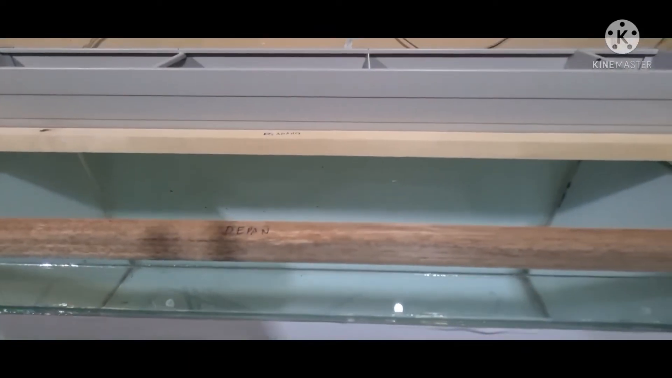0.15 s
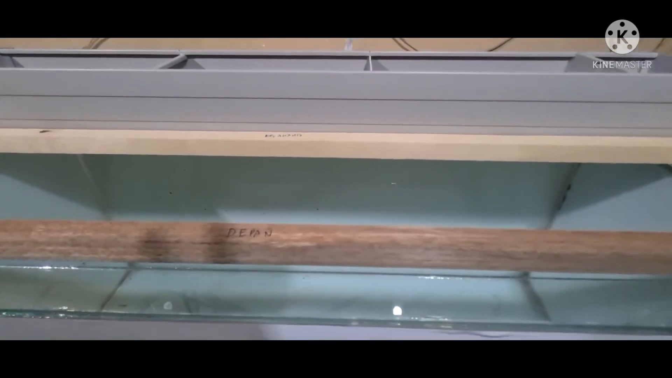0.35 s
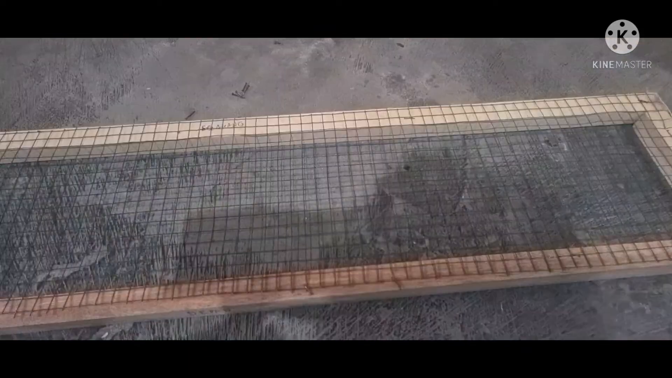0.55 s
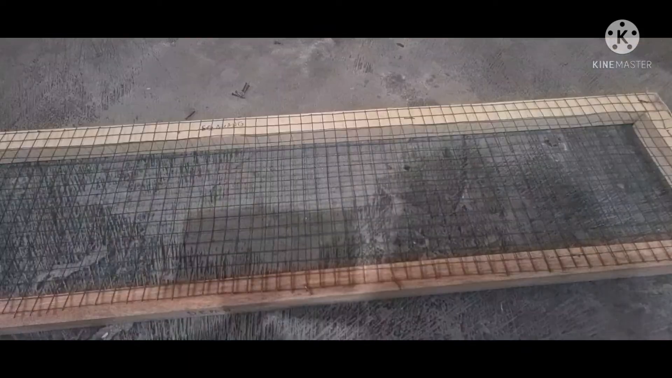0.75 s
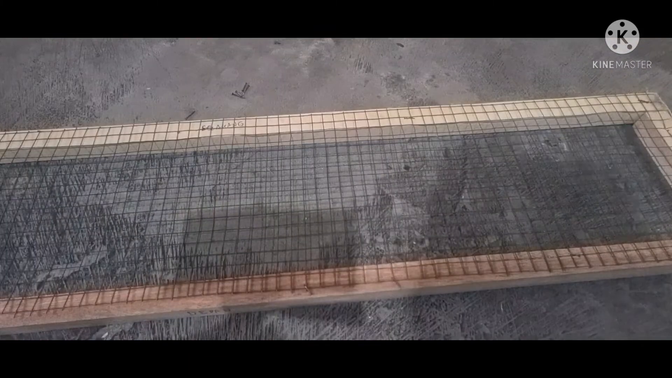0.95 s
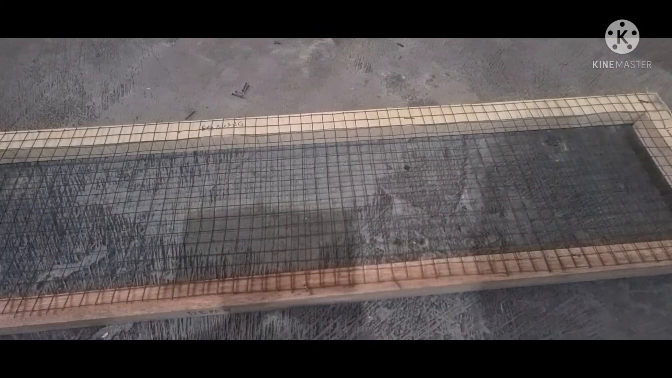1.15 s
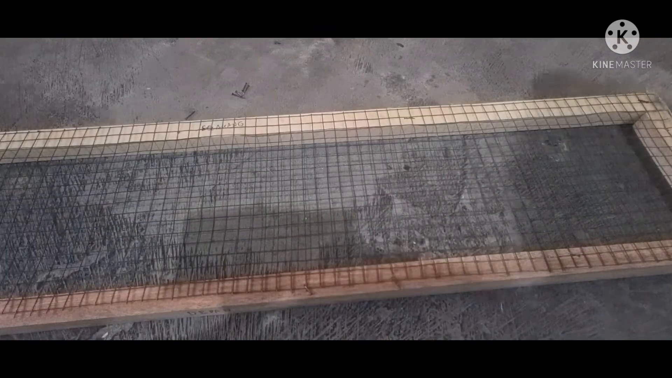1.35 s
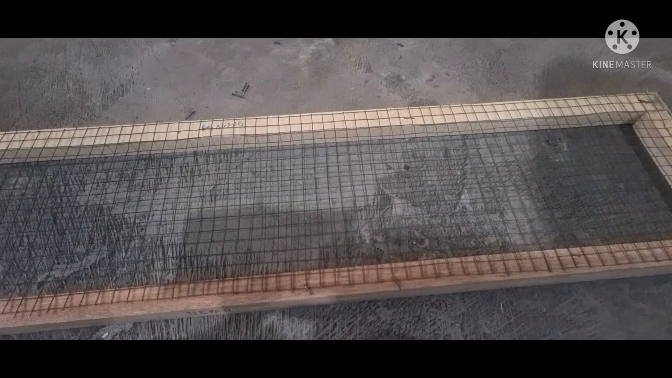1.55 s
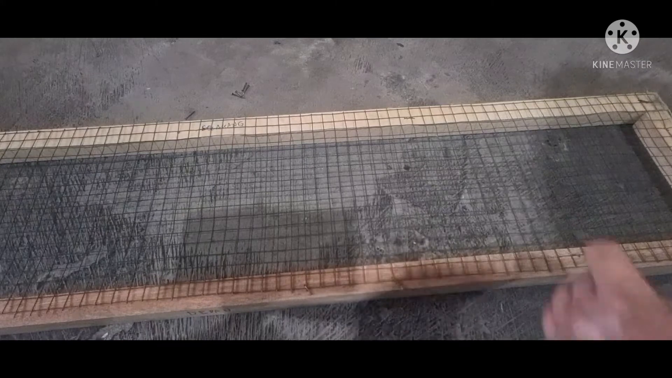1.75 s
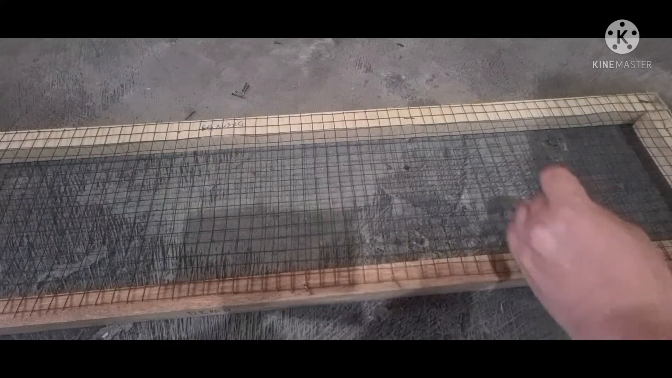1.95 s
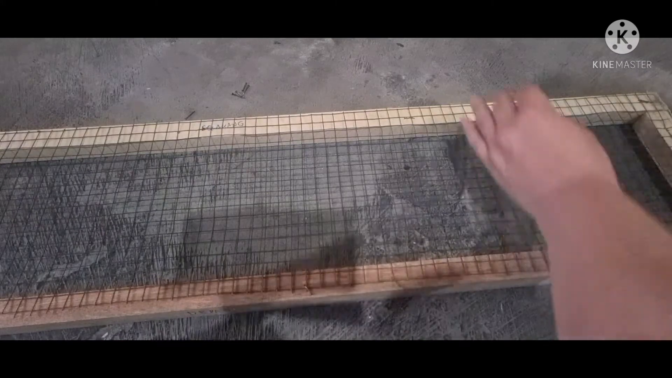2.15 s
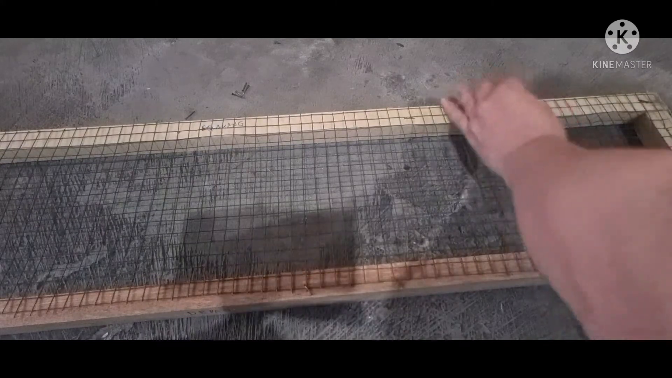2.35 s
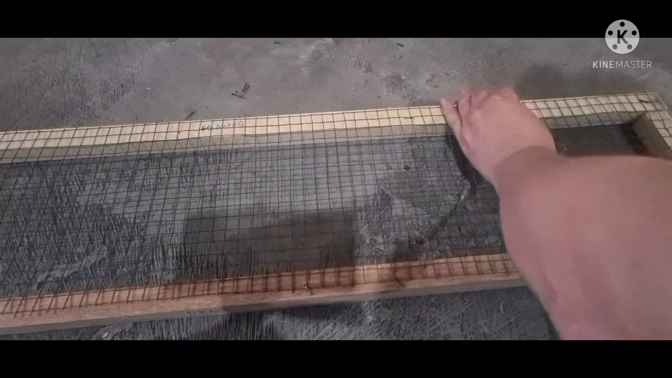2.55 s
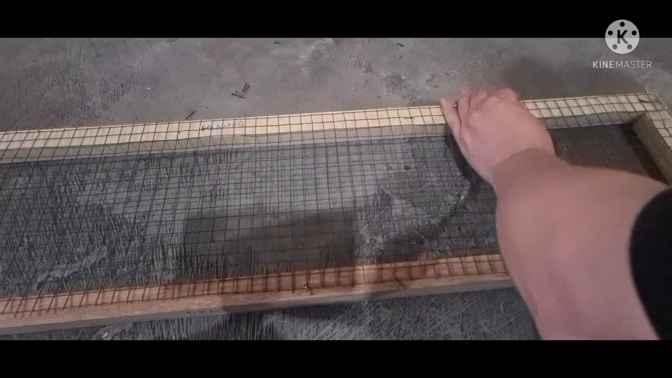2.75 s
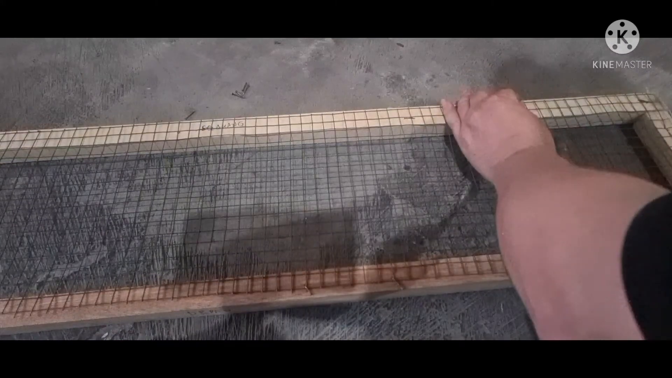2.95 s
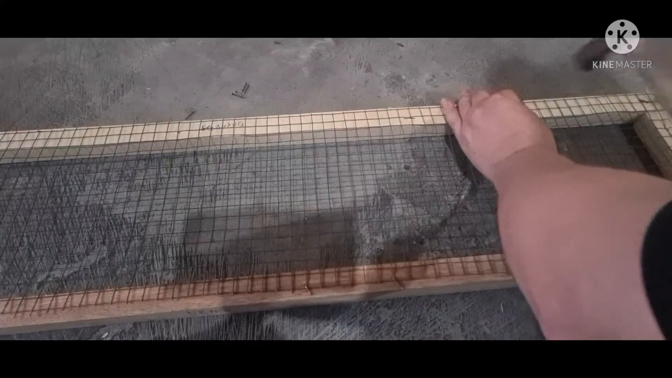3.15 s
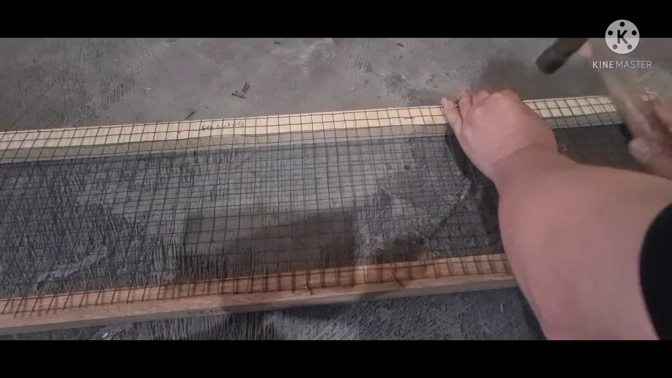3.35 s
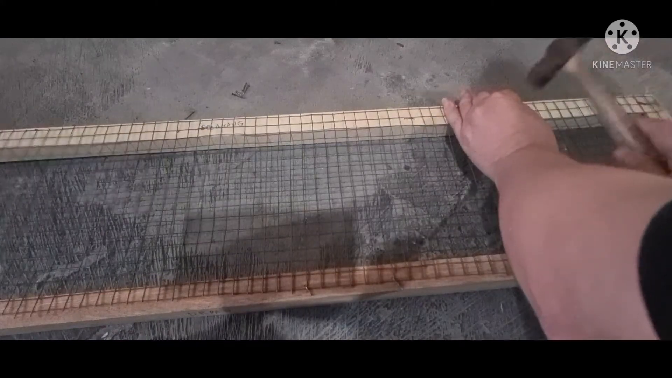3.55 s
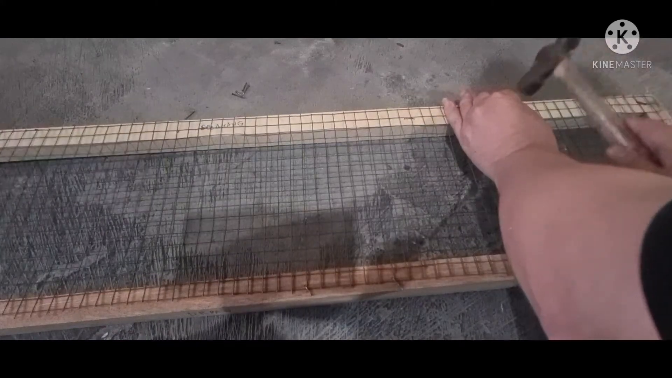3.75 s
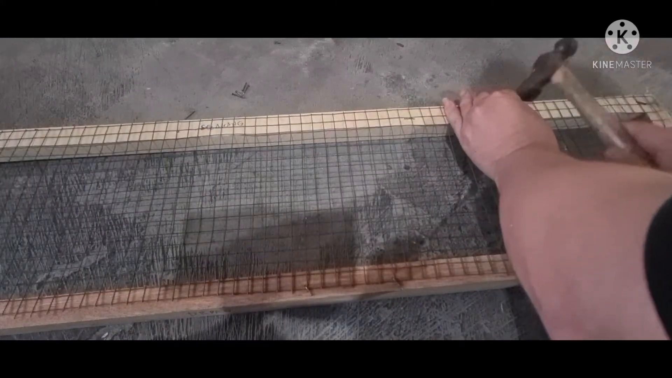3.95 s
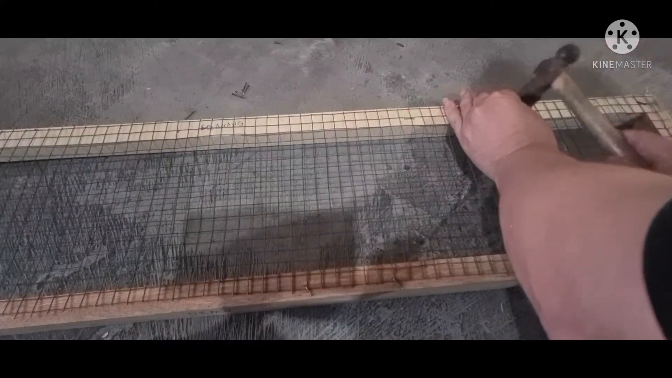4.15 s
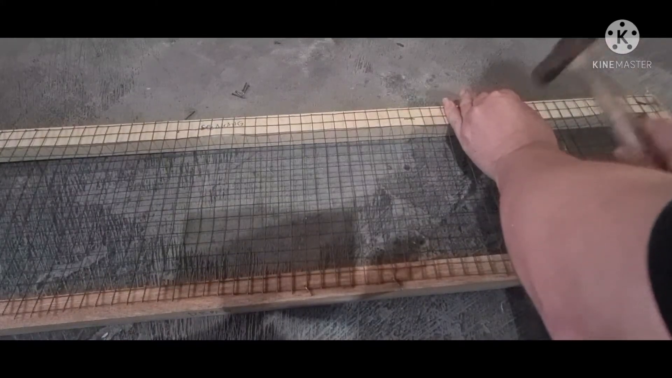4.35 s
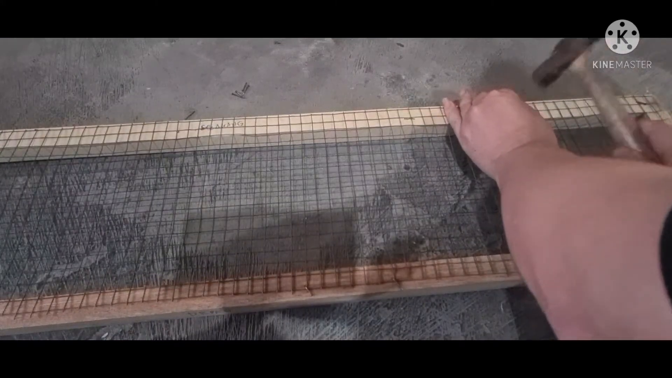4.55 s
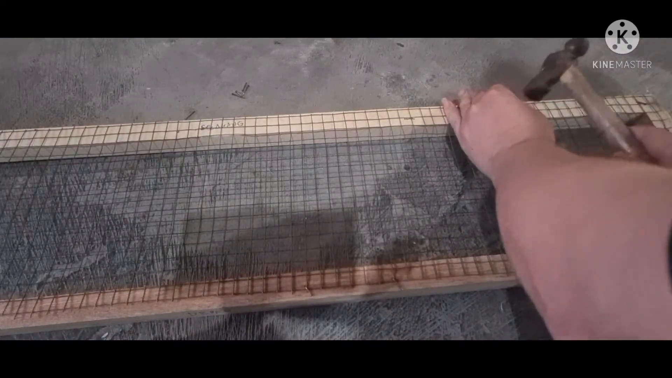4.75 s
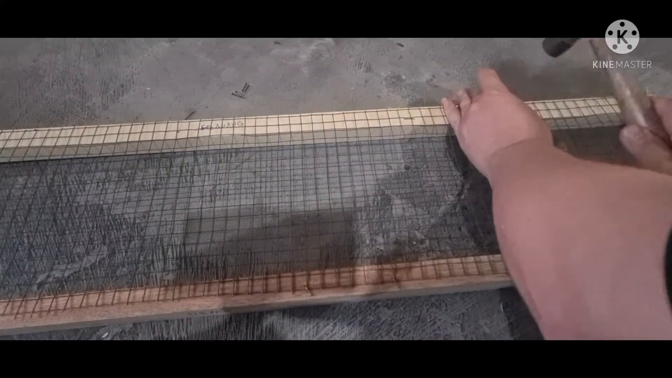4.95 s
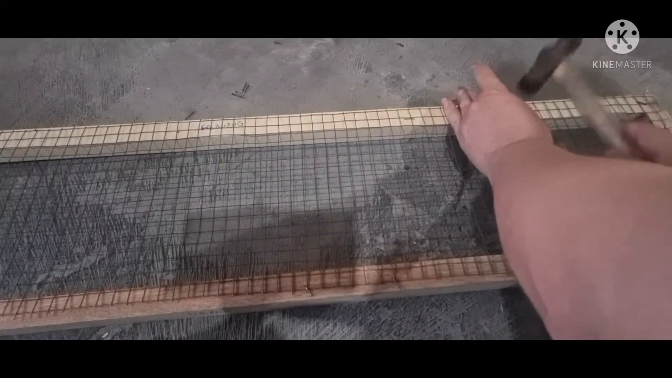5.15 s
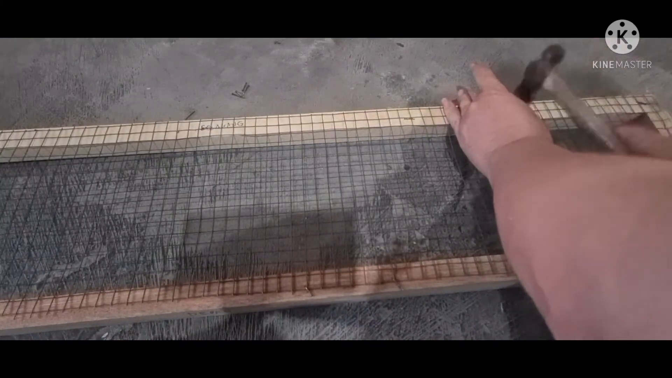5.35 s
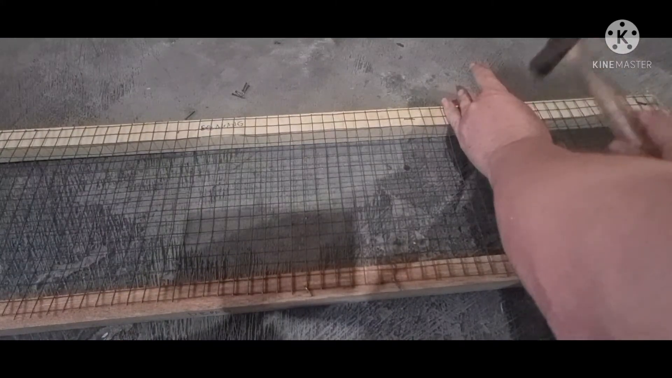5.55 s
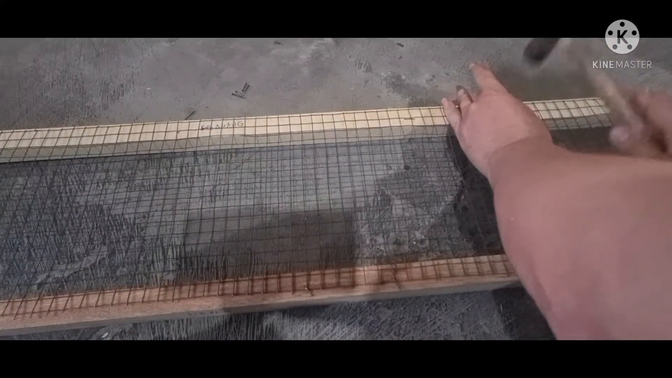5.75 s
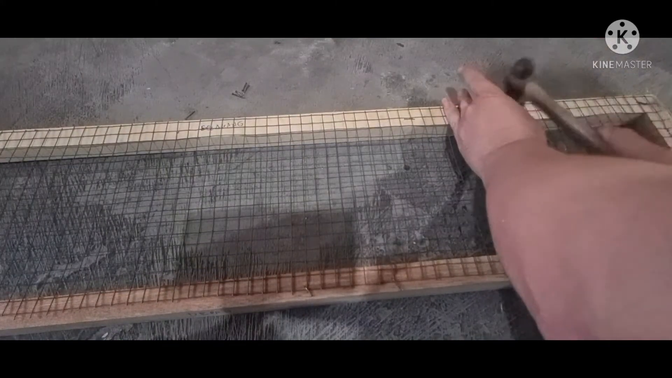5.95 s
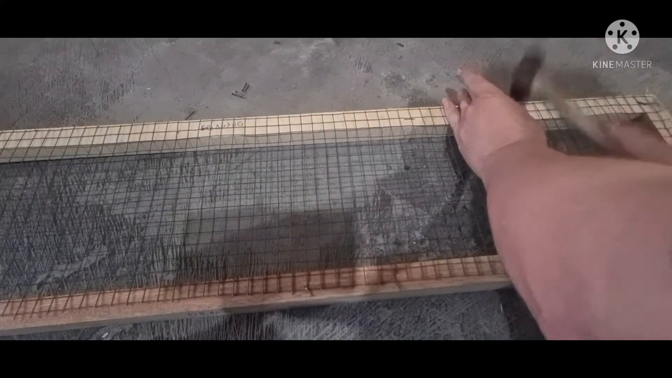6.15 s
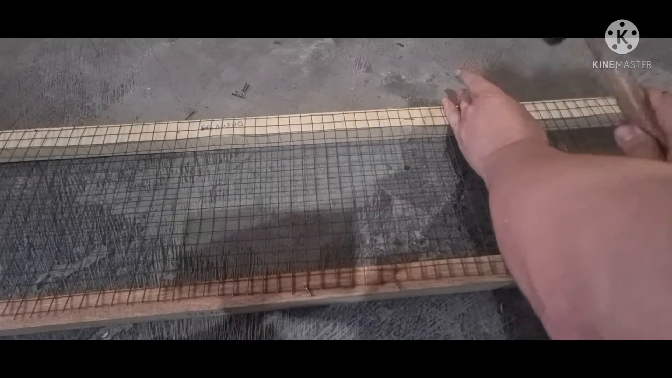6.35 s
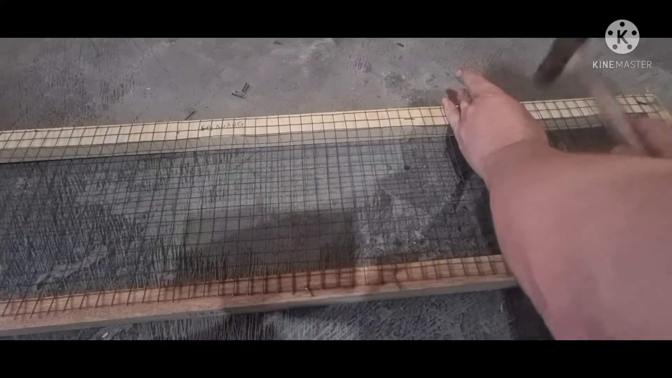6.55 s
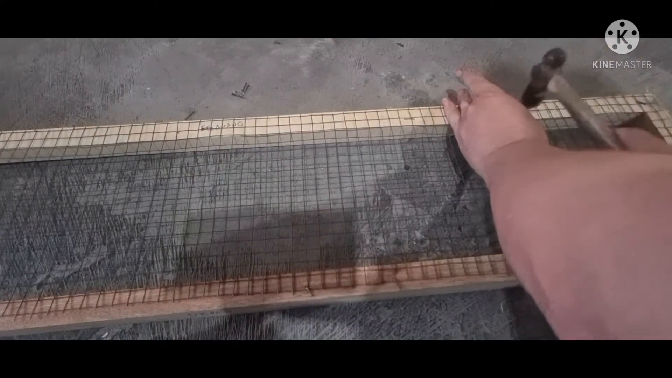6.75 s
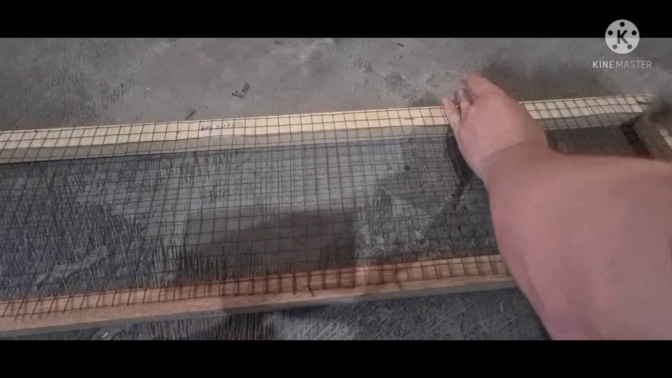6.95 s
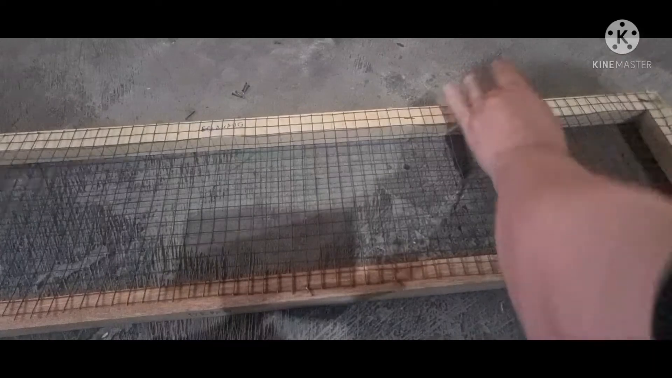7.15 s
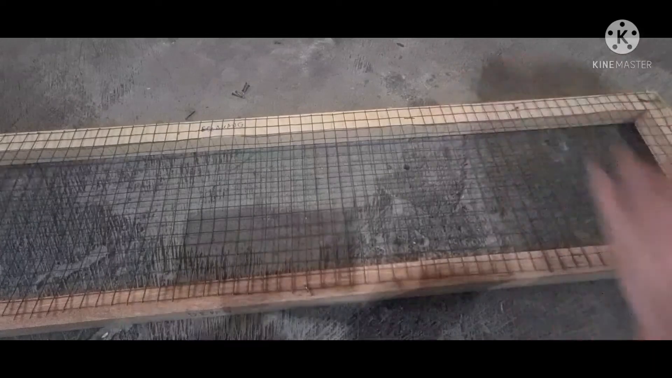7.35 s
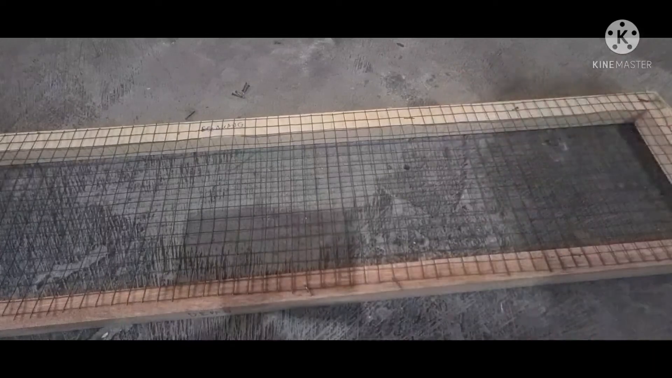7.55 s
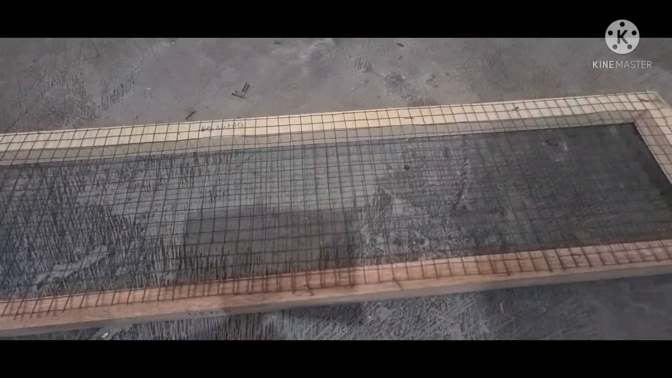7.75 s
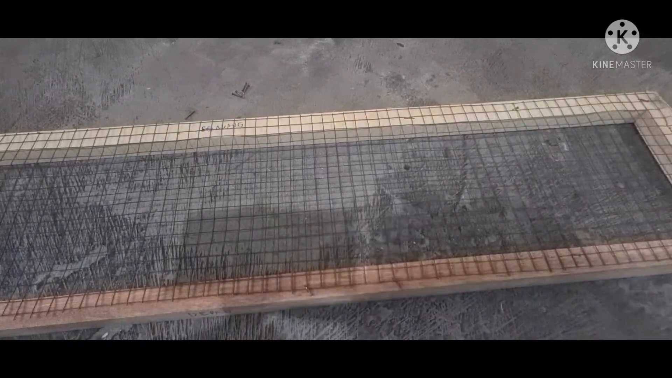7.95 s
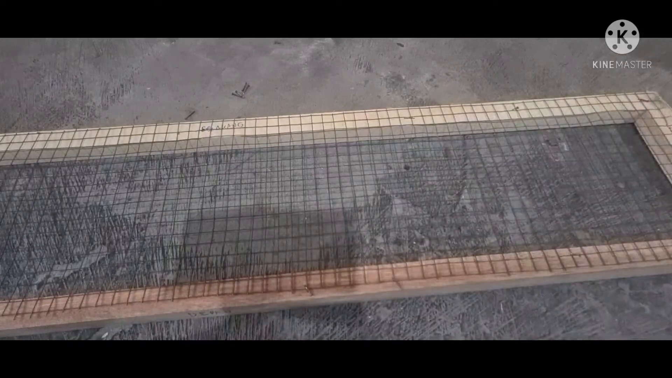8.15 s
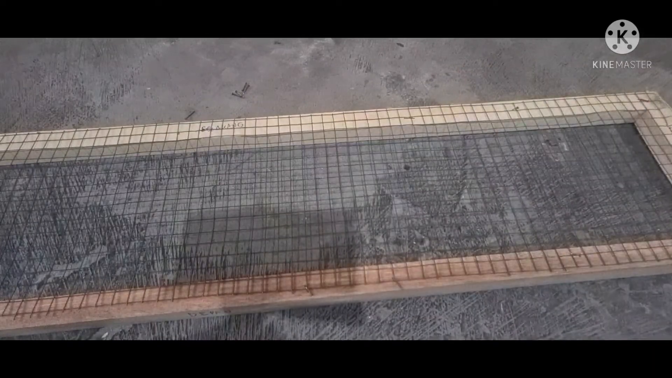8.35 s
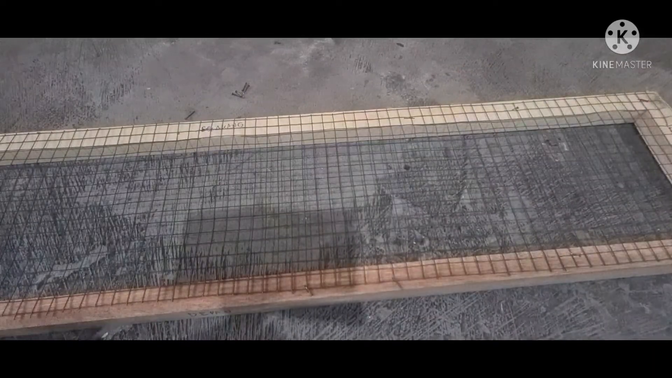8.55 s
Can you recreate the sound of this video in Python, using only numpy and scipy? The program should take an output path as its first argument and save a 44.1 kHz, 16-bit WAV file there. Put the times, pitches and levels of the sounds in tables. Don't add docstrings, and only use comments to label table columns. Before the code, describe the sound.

After scrapes, knocks and shuffling on bare concrete, eleven sharp ringing hammer blows and two duller flush ones shake a mesh-covered wooden frame.

```python
import sys
import numpy as np
from scipy import signal
from scipy.fft import rfft, irfft
from scipy.io import wavfile
from scipy.ndimage import uniform_filter1d

SR = 44100
rng = np.random.default_rng(int(sys.argv[2]) if len(sys.argv) > 2 else 0)


def nominal_scale(level):
    x = np.asarray(level, float) / 20
    return 10 ** x


def generate_wav(signal):
    frames = np.transpose(np.atleast_2d(signal))
    scaled = np.clip(frames, -1, 1) * 32767
    pcm = np.round(scaled).astype(np.int16)
    wavfile.write(sys.argv[1], SR, pcm)


N = 379260

# f/Hz, likeness/1
LIKENESS = [(50, 0.99), (125, 0.98), (250, 0.95), (500, 0.65), (1000, -0.15), (4000, 0.082)]
# f/Hz, t60/s
ROOM_T60 = [(100, 0.33), (260, 0.44), (700, 0.39), (1840, 0.49), (4850, 0.45), (12800, 0.22)]
# f/Hz, level/dB
ROOM_COLOUR = [(100, -3), (300, -1.5), (1000, 1.5), (2300, 2), (3300, -5), (5500, 1.5), (7500, -0.5),
               (10000, 2), (14000, -6.5)]
ROOM_EDGES_HZ = 25 * 2 ** np.arange(1, 9.6, .5)
FLOOR_ECHO = [(34, 1.73), (26, 0.43)]
# t/s, level/dB
SCENE_FADE = [(0, 2.5), (.448, 0), (.452, -72), (.555, -39), (.58, -4.5), (.6, 1.5), (.625, 1.5), (8.6, 6)]

# f/Hz, level/dB
OPENING_HUM = [(15, -49), (25, -33), (44, -5.5), (106, -4.5), (135, -10.5), (278, -12), (488, -24),
               (978, -31), (1150, -37), (1280, -29.5), (1630, -33), (15000, -70.5)]
# f/Hz, level/dB
HUM = [(15, -67), (25, -5.5), (59, 3.5), (112, -7), (186, -4.5), (257, -12), (383, -24), (415, -29),
       (450, -20), (501, -22), (691, -21.5), (1420, -24), (1760, -31), (3350, -38), (15000, -93)]
# f/Hz, width/Hz, level/dB
HUM_PEAKS = [(184.6, 5.5, -5), (137, 7.2, -12.5), (359, 23, -16), (1750, 35, -20.5)]
# t/s, level/dB
HUM_LEVEL = [(0.62, -45), (0.66, -38.5), (0.75, -37), (3.13, -40), (3.97, -39.5), (5.71, -44.5),
             (6.82, -42.5), (6.93, -45), (8.6, -45)]

# t/s, level/dB
DRAG = [(0.56, -72), (0.626, -37.5), (0.654, -43), (0.746, -30.5), (0.95, -31), (1.046, -32), (1.15, -72)]
# f/Hz, width/Hz, level/dB
TOOL = [(2555, 68, 3.5), (3078, 39, 1), (5430, 150, -11), (6680, 110, 0), (9020, 48, -9.5),
        (11200, 200, -20), (13300, 150, -28)]
# f/Hz, level/dB
DRAG_RUMBLE = [(150, -40), (250, -5.5), (390, -1.5), (1390, -3), (1590, -10.5), (3050, -19.5),
               (3810, -26.5), (6710, -27), (15000, -66)]
# t/s, rise/s, hold/s, fade/s, level/dB
PULLS = [
    (0.652, 0.049, 0.083, 0.18, -44),
    (0.896, 0.15, 0.089, 0.23, -47.5),
]

# f/Hz, level/dB, t60/s
THUMP = [(137, 0.5, 0.082), (192, 7, 0.084), (224, 10, 0.13), (262.5, 7.5, 0.062)]
# f/Hz, level/dB, t60/s
WOOD = [(447, -9.5, 0.066), (570, -15, 0.0092), (660, -14, 0.021), (673, 4.5, 0.031), (913, -9, 0.022),
        (1031, 0.5, 0.03), (1170, -3.5, 0.043), (1276, -5, 0.034), (1480, -16.5, .03), (1672, -6.5, 0.031),
        (1754, -11.5, 0.093), (1867, -10.5, 0.025), (2060, 0.5, 0.0041)]
# f/Hz, level/dB, t60/s
STEEL = [(2690, -16, .05), (2875, -14, .05), (2995, -12, .06), (3080, -15, .07), (3325, -10, .09),
         (3385, 0, .013), (3450, -8, .035), (3660, -10, .014), (3780, -11, .015), (3945, -14, .04)]
# f/Hz, level/dB, t60/s
NAIL = [(4460, -3, .014), (5480, 1, .018), (5700, -3, .016), (6070, -7, .016), (6650, -6, .012),
        (8950, -9, .012), (9450, -6, .014), (11900, -14, .012), (15000, -17, .01)]

# t/s, strength/dB, hardness/dB, weight/dB, pan/dB
KNOCKS = [(0.623, -27.5, 6, -12, -7), (1.9305, -47, 6, 13, -3.5), (1.9825, -29, -18, 5.5, 1),
          (2.487, -34.5, 17, -5, -4), (2.5099, -40, -2, -20, 6), (2.8744, -38.5, 17.5, -20, 3),
          (3.3954, -36.5, -12, -3, -2), (7.2444, -59, 25, 17, -3), (7.2888, -34, 9, 5, 2),
          (7.3525, -20, -4, -3, -4), (7.3735, -16.5, -11, -19, 7), (7.7633, -41.5, 23.5, 13.5, 0),
          (8.561, -50.5, 24, 8, -21)]
# t/s, strength/dB, hardness/dB, weight/dB, pan/dB
TICKS = [(0.816, -21, -18, -18, -5), (0.8964, -25, -14, -27, -12), (0.9986, -29.5, -11, 6, -3.5),
         (1.1764, -57, 12, 14, -1), (1.2111, -27, -34, -20, -4.5), (2.2932, -54, 25.5, 22, -3),
         (2.5825, -35.5, -10, -4, -3), (2.7355, -41, -12, -10, 3), (3.3005, -48.5, 2.5, 3, 2),
         (8.1249, -55.5, 3, 17, 5), (8.318, -53, 0, 17, 4), (8.4965, -69, 31.5, 27, -3)]
# t/s, peak/dB, top f/Hz, pan/dB
EDGES = [(3.5635, -22, 800, 3), (3.5739, -12.5, 695, -1), (3.591, -14, 1900, -2), (7.478, -34, 2300, -2),
         (7.392, -29, 4200, 1), (0.8975, -17, 2200, -13), (1.212, -39, 2800, -3), (1.9815, -22.5, 2900, -9),
         (4.0543, -16, 3450, -9), (7.3502, -10, 2620, -3), (7.3713, -9.5, 3800, -6),
         (7.4404, -24, 2480, -10), (7.7639, -25.5, 1430, 9)]
# t/s, peak/dB, f/Hz, t60/s
RINGS = [(2.2944, -17, 1800, 0.0074), (2.298, -31, 1750, .006), (2.8, -33, 1700, .012),
         (4.0546, -21.5, 3000, 0.027), (7.768, -30.5, 183.6, 0.092), (3.612, -22, 210, 0.045),
         (6.056, -37, 2870, .15), (6.062, -40, 2925, .12), (6.052, -23, 3390, .02),
         (6.2937, -21, 3390, .02), (3.5605, -31, 5500, .035), (3.561, -27, 3330, .04),
         (7.605, -37.5, 1500, .04), (7.63, -38, 1550, 0.035), (7.648, -38, 1380, 0.035),
         (6.297, -29, 2000, 0.043), (6.058, -30, 1400, 0.034), (6.3, -50, 4100, 0.11),
         (8.5605, -34, 3000, .014)]

# t/s, rise/s, hold/s, grit/dB, softness/dB
SLIDES = [(1.507, 0.13, 0.029, -37.5, -8.5), (1.6, 0.056, 0.093, -28.5, -4.5),
          (2.116, 0.21, 0.12, -54.5, -9), (2.27, 0.065, 0.049, -42, 6), (2.483, 0.027, .005, -52.5, -3),
          (2.75, 0.036, .003, -78, 8), (3.562, 0.0064, 0.012, -38, -1), (3.67, 0.074, .003, -65.5, -4),
          (7.615, .05, 0.018, -49.5, 4.5), (7.701, 0.19, 0.056, -42, -4.5), (7.995, 0.56, 0.18, -70, -26),
          (8.333, 0.23, 0.0074, -68, -4), (8.6, 0.28, 0.0088, -48, -2.5)]
# t/s, hold/s, fade/s, level/dB
RUBS = [
    (1.213, 0.0019, 0.061, -29),
    (1.984, 0.037, 0.11, -42),
    (2.496, 0.039, 0.31, -38.5),
    (3.566, 0.017, 0.087, -30.5),
    (3.68, 0.0054, 0.15, -43),
    (7.433, 0.019, 0.054, -39),
    (7.765, .003, 0.097, -44.5),
]
# f/Hz, level/dB
SCUFF_DULL = [(800, -13.5), (1250, -3.5), (1700, 0), (2200, -6.5), (3000, -8), (4500, -33)]
# f/Hz, level/dB
SCUFF_GRIT = [(1500, -10), (2600, 1.5), (4000, 1), (5500, -2.5), (8000, -3.5), (12000, -7), (15500, -8.5)]
# f/Hz, level/dB
SCUFF_LOW = [(250, -1), (450, 4), (1000, -1), (1500, 0.5), (2500, -59)]
# t/s, hold/s, level/dB
SQUEAKS = [
    (1.24, 0.069, -54.5),
    (1.694, 0.0054, -29),
    (3.4, 0.02, -47),
]
# f/Hz, width/Hz, level/dB
SQUEAK = [(2800, 420, 7.5), (3140, 100, -3), (4840, 710, -5.5)]

# t/s, strength/dB, hardness/dB, pan/dB
BLOWS = [(3.5608, -25, 10.5, -3), (3.8133, -15, 4.5, 8), (4.0199, -14.5, 11, 1), (4.279, -15.5, 12.5, 1),
         (4.5185, -14.5, 12, 0.5), (4.7275, -16, 13, -4), (5.194, -16.5, 14.5, -1.5),
         (5.4854, -17.5, 17, -2.5), (5.7288, -17, 14.5, -3), (6.052, -19, 4, -5), (6.2937, -21.5, 6, -4)]
# t/s, share taken/1
GRIP = [(4.9, .02), (5.1, 0.56), (5.9, 0.42), (6.0, .2)]
# f/Hz, width/Hz
DEAD_BANDS = [(7800, 990), (10700, 1300)]
# f/Hz, level/dB
MESH = [(2500, -15), (4000, 5.5), (6000, 2.5), (8000, -13), (9500, -0.5), (12500, -14), (15500, -11)]
# f/Hz, width/Hz, level/dB
HEAD = [(2900, 160, -0.5), (3250, 260, 1.5), (3780, 390, -10)]
# t/s, strength/dB, hardness/dB, weight/dB, pan/dB
SLAPS = [
    (3.582, -21, -7, -8, 4),
    (3.8605, -61, -3, 2, 9),
    (4.0545, -23, -3, 1.5, 19),
    (4.3115, -23, 6, 1, 6),
    (4.5594, -23.5, 1, -5, 7),
    (4.7597, -20.5, 3.5, -3, 0),
    (5.2308, -20, 3, -8, 3),
    (5.5185, -25, 0, -4, 3),
    (5.7591, -17, 7.5, -5.5, -1),
    (6.8592, -16.5, -3, -7.5, 3),
]
# t/s, strength/dB, hardness/dB, weight/dB, pan/dB
RATTLES = [
    (3.6018, -46, 19, 7, 10),
    (3.639, -33.5, 8, -9, 8),
    (3.6697, -54.5, 25.5, 5, 15),
    (3.7096, -45, -2, -7, 0.5),
    (6.6, -40, 20, 14, 6),
    (6.834, -29.5, 11.5, 1, 2),
]
# t/s, peak/dB, f/Hz
PINGS = [
    (3.603, -15, 4300),
    (3.639, -21, 4620),
    (3.651, -25, 4200),
    (3.671, -24, 4220),
    (3.709, -47, 4300),
]
# t/s, level/dB
WIRE_TICKS = [
    (6.049, -27),
    (6.293, -28.5),
]
# t/s, strength/dB, hardness/dB, pan/dB
FLUSH_BLOWS = [
    (6.5705, -15.5, 6.5, -0.5),
    (6.8087, -14.5, 2.5, 4.5),
]

LEFT_LAG = 6


def at_hz(points, hz):
    table = np.array(points)
    return np.interp(np.log(hz), np.log(table[:, 0]), table[:, 1])


def gain_in_time(rows, outside_db=-120):
    s, db = np.transpose(rows)
    return nominal_scale(np.interp(np.arange(N) / SR, s, db, outside_db, outside_db))


def rms_one(x):
    return x / np.sqrt(np.mean(x ** 2) + 1e-20)


def band(x, low_hz, high_hz, order=2):
    return signal.sosfilt(signal.butter(order, [low_hz, high_hz], "band", fs=SR, output="sos"), x)


def resonance(x, hz, width_hz):
    r = np.exp(-np.pi * width_hz / SR)
    poles = [1, -2 * r * np.cos(2 * np.pi * hz / SR), r * r]
    return signal.lfilter([(1 - r * r) / 2, 0, (r * r - 1) / 2], poles, x)


def resonances(x, modes):
    return sum(nominal_scale(db) * rms_one(resonance(x, hz, width_hz)) for hz, width_hz, db in modes)


def drift(rate_hz):
    knots = rng.standard_normal(400)
    return np.interp(np.arange(N) / SR * rate_hz, np.arange(400), knots)


def stroke(s, rise_s, hold_s, fade_s, db):
    t = np.arange(0, N, 20) / SR - s
    before = -t / max(rise_s, 1e-3)
    after = (t - hold_s) / max(fade_s, 1e-3)
    shape = nominal_scale(db - 30 * np.maximum(0, np.maximum(before, after)))
    return np.repeat(shape, 20)[:N]


def stereo(mid, side, alike):
    return np.sqrt(1 + alike) * mid + np.sqrt(1 - alike) * side * [[1], [-1]]


def coloured(spectrum, grain_db=0.):
    white = rng.standard_normal((2, N)) * nominal_scale(grain_db * np.minimum(rng.exponential(1, N), 3))
    hz = np.maximum(np.fft.rfftfreq(N, 1 / SR), 1)
    below = hz < spectrum[0][0]
    mid, side = rfft(white) * nominal_scale(at_hz(spectrum, hz) - 44 * below)
    alike = np.clip(at_hz(LIKENESS, hz), -1, .985)
    return rms_one(irfft(stereo(mid, side, alike), N))


def hum():
    white = coloured([(20, 0), (16000, 0)])
    main = coloured(HUM) + resonances(white, HUM_PEAKS)
    main = main * nominal_scale(1.2 * drift(4.357)) * gain_in_time(HUM_LEVEL, outside_db=-47)
    line = nominal_scale(-63) * rms_one(resonance(white, 1050, 12))
    opening = nominal_scale(-42.5) * coloured(OPENING_HUM) + line
    return np.where(np.arange(N) < SR / 2, opening, main)


def dragged_tool():
    clicks = (rng.random((2, N)) < 2500 / SR) * rng.standard_normal((2, N))
    clicks = clicks * nominal_scale(3.8 * drift(58.9)) + 1e-18
    ring = rms_one(resonances(clicks, TOOL))
    pulled = 0
    for pull, tip_hz in zip(PULLS, (4470, 4360)):
        pulled = pulled + stroke(*pull) * (ring + resonances(clicks, [(tip_hz, 75, -3)]))
    judder = nominal_scale(4.0 + 2 * np.cos(2 * np.pi * (np.arange(N) / SR - 0.665) / 0.0442))
    rumble = coloured(DRAG_RUMBLE, grain_db=2.5) * nominal_scale(3.6 * drift(40.4))
    return pulled * judder + gain_in_time(DRAG) * nominal_scale(-1.0) * rumble


def room(x, first_echo_s=0.0014):
    t = np.arange(SR) / SR
    white, tail = rng.standard_normal((2, 2, SR)), 0
    for k, (low, high) in enumerate(zip(ROOM_EDGES_HZ, ROOM_EDGES_HZ[1:])):
        hz = np.sqrt(low * high)
        mid, side = band(white[k % 2], low, high)
        alike = np.clip(at_hz(LIKENESS, hz), -1, 1)
        t60 = at_hz(ROOM_T60, hz)
        onset = np.clip(t / first_echo_s - 1, 0, 1)
        dying = nominal_scale(at_hz(ROOM_COLOUR, hz) - 60 * t / t60) * onset / np.sqrt(t60 * SR / 7)
        tail = tail + dying * stereo(mid, side, alike)
    return signal.fftconvolve(x[None], tail, axes=1)[:, :N]


def struck(modes, low_hz, high_hz, noise_share, noise_t60, contact_s):
    t = np.arange(4096) / SR
    onset = np.minimum(t / contact_s, 1)
    hz, level_db, t60 = np.array(modes).T[:, :, None]
    detune, vary = rng.standard_normal((2, len(modes), 1))
    ringing = -np.sin(2 * np.pi * hz * (1 + 0.0049 * detune) * t) * nominal_scale(level_db + 1.6 * vary - 60 * t / t60)
    ringing = ringing.sum(axis=0) * onset
    scattered = rms_one(ringing * nominal_scale(-60 * t / 0.1)) * ringing.std()

    both, left, right = rng.standard_normal((3, len(t)))
    alike = np.clip(at_hz(LIKENESS, low_hz * 2.05) + 0.4, 0, 1)
    noise = np.sqrt(alike) * both + np.sqrt(1 - alike) * np.array([left, right])
    burst = band(noise * nominal_scale(-60 * t / noise_t60) * onset, low_hz, high_hz, order=4)
    averaged = rms_one(band(1. * (t == 0), low_hz, high_hz, order=4)) * burst.std()
    burst, averaged = (signal.lfilter([1], [1, -.6], v) for v in (burst, averaged))

    tone = np.array([ringing, ringing, scattered]) / np.abs(ringing).max()
    contact = np.vstack([burst, averaged]) / np.abs(burst).max()
    out = (1 - noise_share) * tone + noise_share * contact
    return out / np.abs(out[:2]).max()


def in_parts(events, crack_db, weight_db=0.):
    return [(s, db + hard_db, db + weight_db + sum(heavy_db), db, db + hard_db + crack_db, pan_db)
            for s, db, hard_db, *heavy_db, pan_db in events]


def hits(events, upper_from_hz, shares, t60s, trims_db, contact_s, echo, left_lag=LEFT_LAG):
    out = np.zeros((3, N + 5000))
    parts = [(STEEL, upper_from_hz, 4400), (THUMP, 80, 350), (WOOD, 330, 2150), (NAIL, 4300, 15500)]
    for s, *levels_db, pan_db in events:
        steel, thump, wood, crack = (
            nominal_scale(db + trim) * struck(*part, share, t60, contact_s)
            for db, trim, part, share, t60 in zip(levels_db, trims_db, parts, shares, t60s))
        pan = nominal_scale(np.array([[pan_db], [-pan_db], [0]]) / 2)
        bright = (steel * nominal_scale([[0], [0], [-4]]) + crack) * pan
        for port, (late, gain) in enumerate(FLOOR_ECHO + [(0, 0.051)]):
            at = round(s * SR) + left_lag * (port == 0)
            out[port, at:at + 4096] += (bright + thump + wood)[port]
            at += round(late)
            out[port, at:at + 4096] += echo * gain * bright[port]
    return out[:, :N]


def put_down():
    contacts = in_parts(KNOCKS, crack_db=-22) + in_parts(TICKS, crack_db=2.5)
    return hits(contacts, 2810, shares=(0.58, 1.0, 0.82, 1.0), t60s=(0.019, 0.12, 0.018, 0.0091),
                trims_db=(-13.0, -8.5, 4.5, 1.5), contact_s=0.000057, echo=0, left_lag=3 * LEFT_LAG)


def edges():
    out = np.zeros((3, N + 2000))
    for s, db, top_hz, pan_db in EDGES:
        pulse = band(-1. * (np.arange(1024) == 0), 124, top_hz)
        body = resonance(pulse, 1160, 960)
        pulse = band(pulse + nominal_scale(19) * body, 110, top_hz * 0.81)
        pulse = nominal_scale(db) * pulse / np.abs(pulse).max()
        at = round(s * SR)
        for port, side in enumerate((1, -1, 0)):
            late = 14 * (port == 0)
            out[port, at + late:at + late + 1024] += nominal_scale(side * pan_db / 2) * pulse
        at += round(0.0051 * SR)
        out[:, at:at + 1024] += nominal_scale(-10.5) * pulse
    return out[:, :N]


def scuffs():
    dull, grit, low = (coloured(spectrum, grain_db=3.0) * nominal_scale(1.6 * drift(22))
                       for spectrum in (SCUFF_DULL, SCUFF_GRIT, SCUFF_LOW))
    sliding, soft = 0, 0
    for s, rise_s, hold_s, db, soft_db in SLIDES:
        shape = stroke(s, rise_s, hold_s, 0.11, db)
        sliding = sliding + shape
        soft = soft + shape * nominal_scale(soft_db)
    rubbing = sum(stroke(s, 0.012, hold_s, fade_s, db) for s, hold_s, fade_s, db in RUBS)

    white = rng.standard_normal((2, N))
    squeak = rms_one(sum(nominal_scale(db) * rms_one(resonance(resonance(white, hz, width), hz, width))
                         for hz, width, db in SQUEAK))
    squeaking = sum(stroke(s, 0.011, hold_s, 0.1, db) for s, hold_s, db in SQUEAKS)
    return (sliding * grit
            + (soft + nominal_scale(-13) * rubbing) * dull
            + (nominal_scale(-12.5) * sliding + rubbing) * low
            + squeaking * squeak)


def rings():
    out, t = np.zeros((3, N + 12000)), np.arange(11025) / SR
    for s, db, hz, t60 in RINGS:
        for port in range(3):
            at = round(s * SR) + LEFT_LAG * (port == 0)
            out[port, at:at + len(t)] -= nominal_scale(db - 60 * t / t60) * np.sin(2 * np.pi * hz * t)
    return out[:, :N]


def nail_blows():
    x = hits(in_parts(BLOWS, crack_db=-17.5, weight_db=-3.5), 2720, shares=(.15, .1, .25, .5),
             t60s=(0.011, 0.021, 0.032, 0.035), trims_db=(0.32, 4.36, 9.5, 3.3), contact_s=0.00013, echo=0.68)
    x = x + pings() + wire()
    for hz, width_hz in DEAD_BANDS:
        x = x - 0.83 * resonance(x, hz, width_hz)
    grip = np.clip(np.interp(np.arange(N) / SR, *np.transpose(GRIP)), 0, 1)
    return x - grip * band(x, 10500, 19000, order=1)


def mesh():
    shaking = sum(stroke(s + 0.0037, .002, 0.017, 0.094, db + hard_db - 34.5)
                  for s, db, hard_db, _ in BLOWS + FLUSH_BLOWS)
    return shaking * coloured(MESH, grain_db=3.0) * nominal_scale(4.2 * drift(45))


def head():
    ring = rms_one(resonances(rng.standard_normal((2, N)), HEAD))
    return ring * sum(stroke(s + 0.007, .004, 0.012, 0.22, db + 0.73 * hard_db - 25)
                      for s, db, hard_db, _ in BLOWS)


def frame_slaps():
    contacts = in_parts(SLAPS, crack_db=-15) + in_parts(RATTLES, crack_db=-5.5)
    return hits(contacts, 3140, shares=(0.62, 0.32, 1.0, 1.0), t60s=(0.06, 0.026, 0.017, 0.04),
                trims_db=(-4.0, 4.0, 0.5, -1), contact_s=0.00075, echo=0.14)


def pings():
    out, t = np.zeros((3, N)), np.arange(4096) / SR
    for s, db, hz in PINGS:
        turn = 2 * np.pi * (hz * t + rng.random((3, 1)))
        at = round(s * SR)
        out[:, at:at + 4096] += nominal_scale(db - 60 * t / .013) * np.minimum(t / 0.00064, 1) * np.sin(turn)
    return out * nominal_scale([[0], [0], [-9]])


def wire():
    out = np.zeros((3, N))
    for s, db in WIRE_TICKS:
        at = round(s * SR)
        out[:, at:at + 4096] += nominal_scale(db + 7.0) * struck(NAIL, 12400, 20700, 0.93, 0.031, .0003)
    return out


def flush_blows():
    return hits(in_parts(FLUSH_BLOWS, crack_db=-10, weight_db=1), 2540, shares=(0.44, 0.063, 0.97, 0.88),
                t60s=(0.056, 0.073, 0.035, 0.017), trims_db=(3.0, 2.8, 6.2, 3.2), contact_s=0.00071, echo=0.24)


def scene():
    friction = dragged_tool() + scuffs()
    knocks = put_down() + edges() + rings()
    blows, slaps, flush = nail_blows(), frame_slaps(), flush_blows()
    knocks_sent = knocks[2] + nominal_scale(6) * resonance(knocks[2], 3700, 1800)
    flush_sent = flush[2] - .65 * resonance(flush[2], 3450, 350) + .6 * resonance(flush[2], 2400, 1000)
    sent = (nominal_scale(-5.5) * friction.mean(axis=0) + nominal_scale(-6.5) * knocks_sent
            + nominal_scale(-1.5) * blows[2] + nominal_scale(3.0) * slaps[2] + flush_sent)
    close = (blows + flush + slaps + knocks)[:2] + friction
    return close + room(sent) + hum() + mesh() + head()


def masked(x, size=8):
    hz, _, z = signal.stft(x, SR, "cosine", 2048, 1024)
    power = (np.abs(z[:, :1024]) ** 2).sum(axis=0)
    power = power.reshape(-1, size, z.shape[2]).sum(axis=1) + 1e-20
    level_db = 10 * np.log10(power)
    middle_db = 10 * np.log10(power[6:24].mean(axis=0))
    band_hz = hz[:1024:size, None]
    chance = rms_one(uniform_filter1d(rng.standard_normal(power.shape), size=3, axis=1))
    valley = level_db - uniform_filter1d(level_db, size=17, axis=0) + 2.6 * chance < -2.2
    steady = np.diff(middle_db, prepend=0) < 8
    faint = (level_db < middle_db - 13) & (band_hz > 6900)
    drop = valley & steady & np.roll(steady, 1) & faint
    drop = drop | steady & (band_hz > 15650)
    z = z * np.vstack([np.repeat(~drop, size, axis=0), ~drop[:1]])
    return signal.istft(z, SR, "cosine", 2048, 1024)[1][:, :N]


def band_limit(x):
    return signal.sosfilt(signal.butter(12, 16830, fs=SR, output="sos"), x)


def record(dry):
    x = 0.89 * np.tanh(dry / 1.165) * gain_in_time(SCENE_FADE, outside_db=0)
    x = signal.sosfilt(signal.butter(3, 42, "high", fs=SR, output="sos"), x)
    ahead = rms_one(rng.standard_normal((2, 700)) * np.linspace(.2, 1, 700)) / np.sqrt(700)
    smear = signal.fftconvolve(x, ahead, axes=1)[:, 699:]
    x = x + nominal_scale(-23) * band(smear, 300, 15500)
    mix = signal.sosfilt(signal.cheby2(16, 80, 16650, fs=SR, output="sos"), masked(x))
    return band_limit(mix)


dry = scene()
out = record(dry)
generate_wav(out)
```